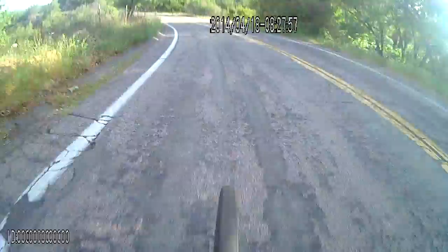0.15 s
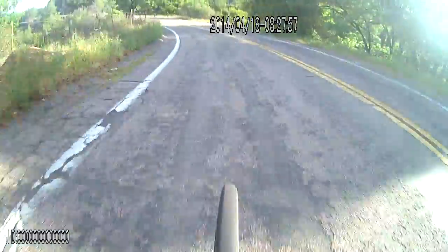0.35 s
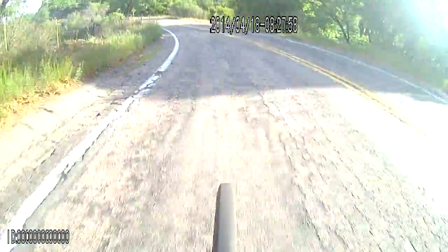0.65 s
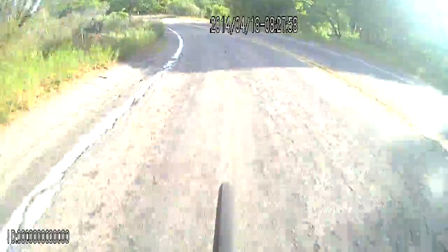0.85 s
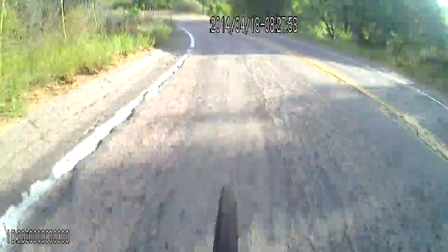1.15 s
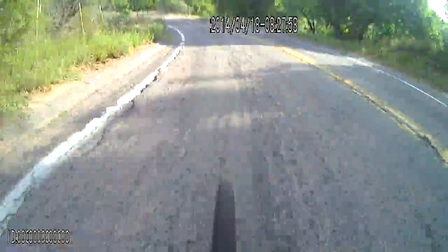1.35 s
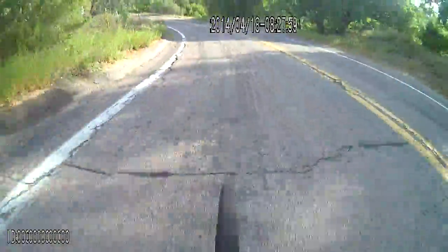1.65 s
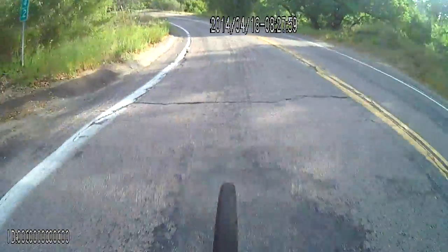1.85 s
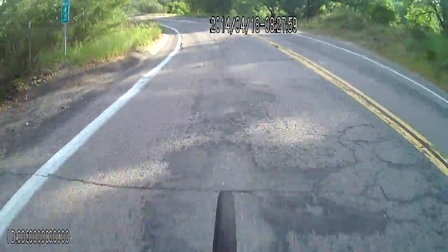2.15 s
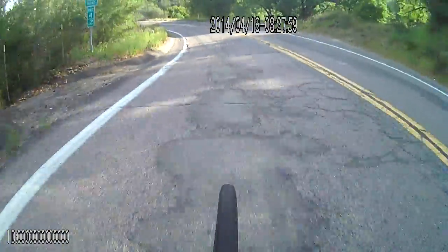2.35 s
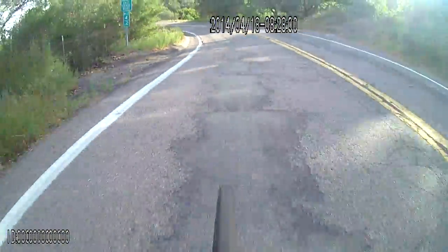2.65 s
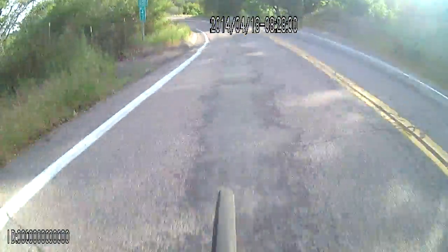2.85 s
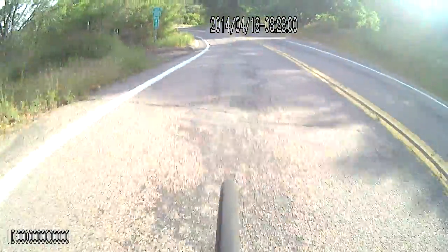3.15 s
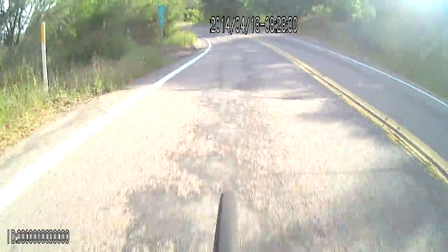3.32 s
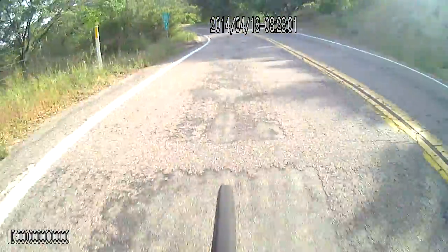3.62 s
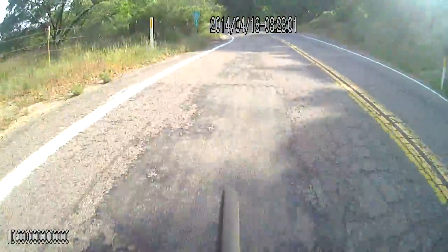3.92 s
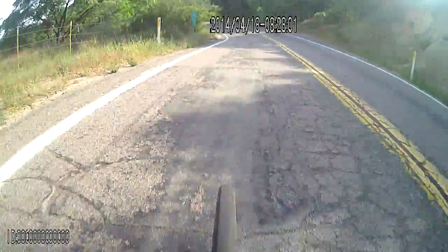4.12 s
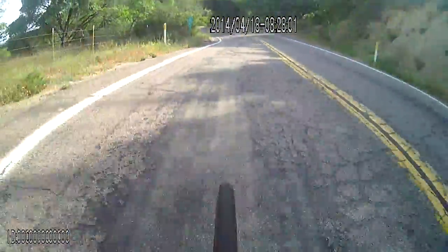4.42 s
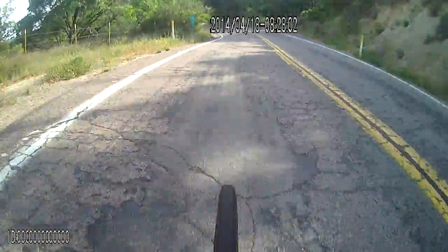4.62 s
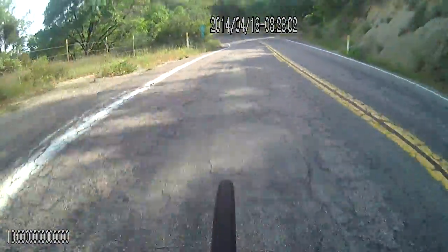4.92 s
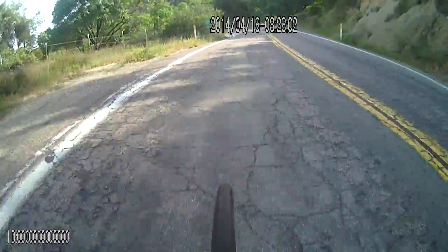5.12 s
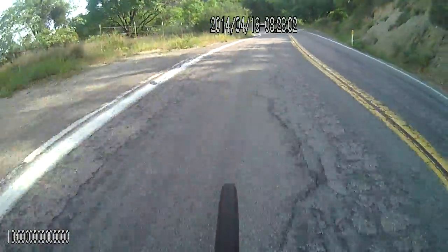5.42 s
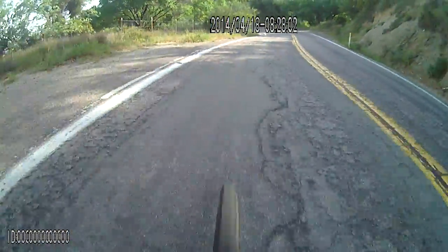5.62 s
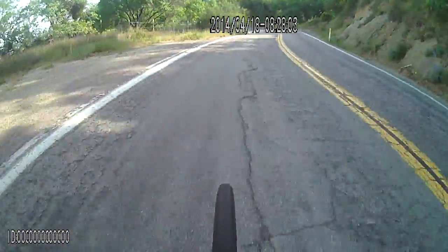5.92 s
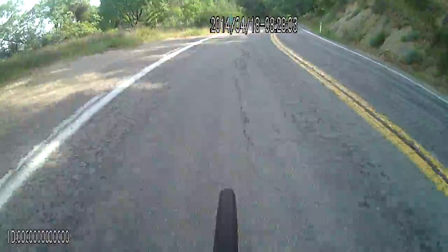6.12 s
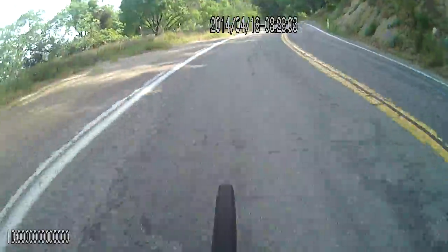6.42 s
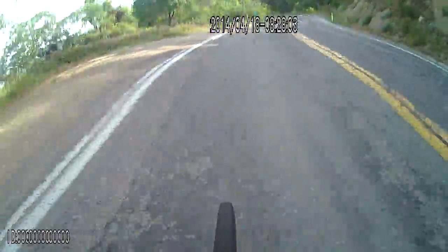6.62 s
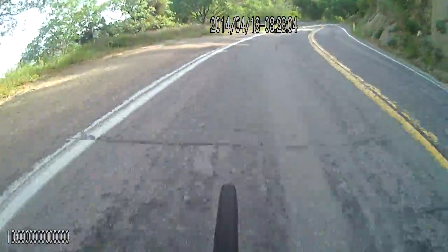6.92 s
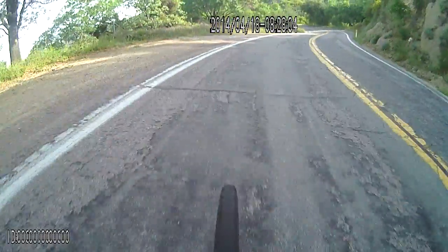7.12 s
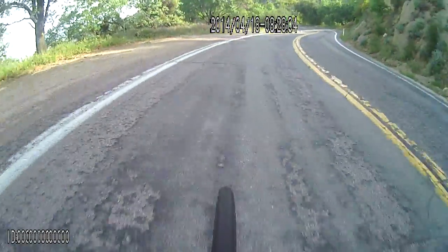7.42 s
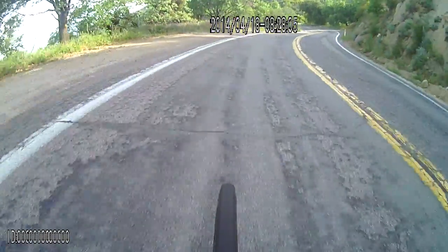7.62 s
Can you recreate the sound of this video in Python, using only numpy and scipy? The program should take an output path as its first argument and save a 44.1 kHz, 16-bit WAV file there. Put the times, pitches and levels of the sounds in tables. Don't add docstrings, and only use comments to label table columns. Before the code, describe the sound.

Close on a bicycle outdoors, a loose camera body chatters against its mount in bursts of about thirty knocks a second, each a dry thud with a piercing, very short high ring. Low turbulent wind rumbles and slaps the microphone in the gaps, pumping down at every hard knock and swelling back. Faint ticks, hiss and clinks fill in behind.

```python
import sys
import numpy as np
from scipy import signal
from scipy.fft import rfft, irfft, next_fast_len
from scipy.io import wavfile
from scipy.ndimage import uniform_filter1d

SR = 44100
rng = np.random.default_rng(int(sys.argv[2]) if len(sys.argv) > 2 else 0)


def linear_from_db(decibels):
    return 10 ** (np.asarray(decibels, float) / 20)


def dump(signal):
    limited = np.clip(np.atleast_2d(signal).T, -1, 1)
    pcm = np.round(limited * 32767).astype(np.int16)
    wavfile.write(sys.argv[1], SR, pcm)


N = 342216
RECOVER_DB_PER_S = 394

# start in seconds, peak in dB,
# pitch in Hz, contact in ms, dive of the gain in dB.
CLINKS = [(0.4092, -11.5, 1630, 2.9, 1), (.868, -23, 7600, 4, -10), (1.0924, -6.5, 1640, 2, 5.5),
          (2.022, -13, 1570, 2.3, -9), (3.494, -9.5, 1540, 2.6, 7), (4.677, -11.5, 1570, 2.5, -2),
          (4.784, -25, 7900, 2, 4.5), (5.06, -12.5, 1540, 2.7, 2), (5.104, -26, 7700, 3, 0),
          (5.133, -34, 7500, 2.8, 0), (6.11, -11.5, 1690, 2.1, -2), (6.565, -12, 1660, 2.1, 5.5),
          (6.753, -13.5, 1940, 7.8, 19), (6.7546, -21, 3920, 8, 5), (6.8088, -7, 1880, 1.2, 12),
          (6.807, -18, 3020, 1.9, 1), (6.91, -12.5, 1640, 2.6, -1.5), (7.451, -15.5, 2280, 8.2, 8),
          (7.585, -40, 1500, 2.5, 8), (7.634, -11.5, 1580, 2.2, 3), (7.6837, -13.5, 1560, 2.5, 6.5),
          (7.734, -15, 1610, 3, -7)]
# frequency in Hz, level in dB per Hz.
TICK_SPECTRUM = [(1500, 1), (3500, 1), (5200, -1.5), (7300, 2), (9300, -13), (11000, -9.5), (13000, -25),
                 (15300, -26), (16000, -60)]


def level(x, db):
    return x * linear_from_db(db) / np.sqrt(np.mean(x ** 2))


def modes(x, table, detune):
    out = 0
    for (hz, db, t60), d in zip(table, detune):
        pole = np.exp(2j * np.pi * hz * d / SR - np.log(1000) / (t60 * SR))
        out = out + linear_from_db(db) * signal.lfilter([1], [1, -pole], x).imag
    return out


def walk(rate):
    k = int(SR / rate)
    held = np.repeat(rng.standard_normal(N // k + 1), k)
    return 1.08 * uniform_filter1d(uniform_filter1d(held, k), k)[:N]


def colour(x, points, lo_hz=0, hi_hz=np.inf):
    size = next_fast_len(N)
    hz = np.arange(1, size // 2 + 2) * SR / size
    point_hz, point_db = np.array(points).T
    shape = linear_from_db(np.interp(np.log(hz), np.log(point_hz), point_db))
    return irfft(rfft(x, size) * shape * (hz >= lo_hz) * (hz < hi_hz), size)[:N]


def wind(shake_db):
    # frequency in Hz, level in dB per Hz.
    wind_spectrum = [(8.8, -38), (15, -1.5), (38, 1.5), (76, 0), (282, -10.5), (516, -12.5), (1010, -27),
                     (1100, -23.5), (1280, -36.5), (1550, -23.5), (1650, -30), (1880, -37), (2100, -61),
                     (2240, -59), (2600, -67), (3380, -75), (5720, -120)]
    edges_hz = [0, 45, 90, 180, 360, 720, 1400, 3000]
    swell = 0.23 * walk(15) + 1.38 * walk(45)
    flutter = [walk(25) for _ in edges_hz]
    out = 0
    for k in range(len(edges_hz) - 1):
        db = swell + 1.21 * (flutter[k] + flutter[k + 1]) + shake_db * (edges_hz[k] < 50)
        band = colour(rng.standard_normal(N), wind_spectrum, edges_hz[k], edges_hz[k + 1])
        out = out + linear_from_db(db) * band
    return level(out, 0)


def chatter():
    # frequency in Hz, level in dB per Hz.
    chatter_spectrum = [(590, -32), (1000, -4.5), (1110, -21), (1290, -5), (1650, 1), (2180, -10.5),
                        (2280, -17), (3710, -10.5), (5380, -40.5), (6940, -27.5), (9280, -41), (11000, -34),
                        (12500, -54), (14800, -46), (16000, -76)]
    hiss = linear_from_db(3.4 * walk(40)) * colour(rng.standard_normal(N), chatter_spectrum)
    size_db = np.minimum(3.9 * rng.exponential(size=N), 8.5) + 1.8 * walk(25)
    impulses = (rng.random(N) < 300 / SR) * linear_from_db(size_db)
    smear = signal.lfilter([1], [1, -.98], impulses) * rng.standard_normal(N)
    bright = level(colour(smear, TICK_SPECTRUM), -10.5)
    steady = level(colour(rng.standard_normal(N), TICK_SPECTRUM), -13.5)
    return level(hiss, 0) + bright + steady + level(colour(smear, chatter_spectrum), -2.5)


def handlebar(blows, road):
    # frequency in Hz, level in dB, t60 in seconds.
    boom = (495, -24, 0.083)
    return level(modes(blows + 0.019 * road, [boom], [1]), boom[1])


def spoke(blows, road):
    # frequency in Hz, level in dB, t60 in seconds.
    thin_ring = (2117, -40, 0.21)
    return level(modes(blows + 0.0012 * road, [thin_ring], [1]), thin_ring[1])


def rattle():
    # start in seconds, shrill ring in dB, thud in dB, dive of
    # the gain in dB.
    mount_knocks = [(0.0035, -6.5, -33, 17.5), (0.035, -14, -23, 0), (0.0643, -0.5, -26, 11),
                    (0.0853, -10, -16, 8.5), (0.1199, 0, -5.5, 27), (0.1485, -9, -19, 20),
                    (0.174, -19, -44, 7), (0.2159, -7.5, -7, 18), (0.241, -14, -19, 9.5),
                    (0.2774, -2, -13.5, 17.5), (0.3086, -6.5, -14.5, 14), (0.761, -1, -44, 17.5),
                    (0.787, -6, -28, 15.5), (0.892, -10, -8, 12), (0.9176, -15, -18, 13),
                    (0.9473, -10, -16.5, 16), (0.9768, -15, -16.5, 18.5),
                    (1.1057, 7.5, -6.5, 31), (1.1396, -6.5, -17, 26), (1.1738, -4.5, -12, 27.5),
                (1.205, -5.5, -21, 23.4), (1.2419, -2.5, -10, 24), (1.276, -5, -16, 19),
                (1.309, -8.5, -11.5, 20), (1.3356, -5.5, -12.5, 16), (1.368, -2, -11, 22.3),
                (1.3944, -12, -21, 10), (1.415, -0.5, -12, 26), (1.4469, -13, -12.5, 20),
                (1.5398, -9, -7, 13.3), (1.5718, -12, -17, 27), (1.6051, -10, -22, 18.5),
                (1.713, 3, -9, 23), (1.7972, 0.5, -8, 28), (1.8251, -12, -14.5, 15),
                (1.8705, -1, -12.5, 25.6), (1.938, 4.5, -3.5, 31.3), (1.966, -18, -20.5, 9),
                (2.0364, 0, -9.5, 28.6), (2.0787, -2, -7.5, 28), (2.1147, -2.5, -9, 24),
                (2.147, -5, -19, 26), (2.1845, -3, -11, 26.6), (2.238, -7, -37, 13),
                (2.269, -4.5, -25, 18.4), (2.2895, -9, -14.5, 17.5),
                    (2.7613, 3, -7, 28), (2.8076, -2, -8, 26.5), (2.847, -2.5, -13, 30),
               (2.8806, -7.5, -20.5, 21), (2.913, -3, -12.5, 24.6), (2.9542, -3, -14, 27),
               (2.987, -6, -10.5, 23.4), (3.0255, 1.5, -7, 30), (3.063, -10, -14, 24),
               (3.097, -4.5, -14, 24.4), (3.13, -6.5, -14, 14.4), (3.1692, -2, -9, 18.5),
               (3.2023, -6, -17.5, 14), (3.241, -4, -11.5, 20), (3.274, -5.5, -16.5, 23),
               (3.305, -7.5, -17, 20), (3.348, 2, -6.5, 33), (3.373, -13, -23, 27),
               (3.406, -6.5, -16, 22.4), (3.5109, 3.5, -7.5, 29.3), (3.5404, -10, -16.5, 15),
               (3.569, -3.5, -20.5, 19.6), (3.6525, -11, -31, 7.4), (3.957, -1, -8, 23.3),
                    (4.3986, -17, -44, 4.8), (4.43, 2, -7.5, 31), (4.4706, 1.5, -7.5, 28), (4.5079, -5, -11, 32),
              (4.5488, -5, -10, 22.7), (4.5994, -9, -16, 10.7), (4.6738, -19, -16, 3.6),
              (4.7309, -9.5, -9.5, 19), (4.8429, 3, -13.5, 27), (4.8706, -17, -15.5, 13),
              (4.9094, -9.5, -18, 1), (4.9416, 6.5, -6.5, 36), (4.975, -11.5, -16.5, 23),
              (5.0038, -14, -36, 10), (5.029, -4.5, -32, 16), (5.075, -1.5, -14, 21),
              (5.6903, -12, -11, 22.5), (5.7168, -19, -28, 18.3), (5.7709, 0.5, -6, 26.5),
              (5.8031, -5.5, -13, 23), (5.837, -4.5, -13, 21.5), (5.8645, -22, -30, 13.6),
                    (6.0094, -11, -13, 5.5), (6.12, 3, -20, 26), (6.1532, -6, -15, 27), (6.188, -5, -14, 25),
             (6.222, -10, -16, 22), (6.336, -10, -36, 8), (6.5741, -6, -11, 27.5), (6.625, 2.5, -5.5, 31.5),
             (6.6793, 3.5, -7, 29.5), (6.719, -3.5, -14.5, 27), (6.7557, -16, -18, 16.5),
             (6.795, -18, -46, -1.5), (6.8167, -17, -19, 11.5), (7.2149, 0, -13, 20),
             (7.236, -15, -13, 20.5), (7.2646, -2.5, -16, 20), (7.2924, -14, -9.5, 17.5),
             (7.451, -11.5, -10.5, 11.5)]
    return mount_knocks


def contacts(table, ms):
    scatter = np.exp(0.3 * rng.standard_normal(len(table)))
    return [(*row[:3], ms * k) for row, k in zip(table, scatter)]


def knocks(table, pitch):
    # frequency in Hz, level in dB, t60 in seconds.
    ring_modes = [(7700, 15.5, 0.012), (7570, 12, 0.0047), (7900, 6, 0.018), (8400, -52, 0.0026)]
    body_modes = [(515, -13, 0.0082), (1610, 12, 0.0074), (2315, 2, 0.0084), (3124, -1, 0.012),
                  (3720, -7, 0.022), (5030, -7, 0.021), (6330, -40, 0.0084), (9650, 7, 0.004),
                  (11000, -23, 0.0026), (13000, -9, 0.0035), (15400, -24, 0.0026)]
    size = 1024
    t = np.arange(size) / SR
    chance = rng.standard_normal((len(table), 2, size))
    tune = 1 + 0.019 * rng.standard_normal((len(table), len(ring_modes) + len(body_modes)))
    bias_db = 1.7 * rng.standard_normal((len(table), len(body_modes)))
    fade = np.exp(-(t / 0.0081) ** 2)
    port = signal.butter(2, [6800, 8300], "bandpass", fs=SR, output="sos")
    tap = np.exp(-t / .00004)
    out, blows = np.zeros(N + size), np.zeros(N + size)
    for (s, ring_db, thud_db, ms), (scrape, grit), detune, bias in zip(table, chance, tune, bias_db):
        contact = np.clip(t / (ms * 0.00071), 0, 1)
        push = np.sin(np.pi * contact ** 0.66) + 0.36 * contact * np.exp(-t / 0.0029)
        ring = modes(scrape * push, ring_modes, pitch * detune)
        ring = fade * (0.96 * ring + signal.sosfilt(port, ring))
        blow = tap + grit * (0.083 * np.exp(-t / 0.0022) + 0.037 * np.exp(-t / 0.0028))
        struck = [(hz, db + b, t60) for (hz, db, t60), b in zip(body_modes, bias)]
        thud = fade * modes(blow, struck, detune[len(ring_modes):])
        start = max(int((s - .0004) * SR), 0)
        out[start:start + size] += linear_from_db(ring_db) * ring / np.abs(ring).max()
        out[start:start + size] += linear_from_db(thud_db + 6.0) * thud / np.abs(thud).max()
        blows[start] += linear_from_db(thud_db)
    return np.array([out[:N], blows[:N]])


def all_knocks():
    # start in seconds, shrill ring in dB, thud in dB.
    taps = [(0.1538, -8, -41), (0.4501, -21, -19), (0.4776, -20, -16), (0.6461, -17, -53),
            (0.8541, -24, -14.5), (0.9257, -9.5, -33), (0.9496, -14, -35), (0.9831, -8, -33),
            (1.1418, -8, -24), (1.4495, -8, -22), (1.5232, -22, -14), (1.5763, 0, -41), (1.7703, -22, -34),
            (1.8037, -8, -25), (3.066, -7.5, -39), (3.1355, -12, -28), (3.2795, -8, -42),
            (3.3762, -10, -21), (4.7372, -6.5, -19), (5.3148, -12.5, -29), (5.6982, -4.5, -27),
            (5.7264, -12, -26), (6.3065, -16, -43), (6.5781, -7, -26), (6.7893, -28, -17),
            (7.1831, -25, -28), (7.2413, -8, -43), (7.4286, -21, -21), (7.62, -21.5, -20),
            (7.7456, -17, -23.5)]
    rebounds = [(0.0084, -20, -46), (0.1246, -14, -32), (0.2223, -7, -26), (0.245, -22, -32),
                (0.8987, -13, -32), (0.9182, -18, -27), (0.9559, -15, -39), (0.98, -21, -30),
                (1.1101, -13, -30), (1.1776, -13, -30), (1.2097, -16, -38), (1.2456, -18, -35),
                (1.2816, -17, -38), (1.3136, -17, -36), (1.3159, -26, -41), (1.5412, -16, -28),
                (1.8299, -22, -26), (1.8769, -17, -44), (1.9417, -15, -32), (2.0451, -11, -39),
                (2.1201, -17, -38), (2.1901, -15, -38), (2.2978, -16, -42), (2.9191, -13, -33),
                (2.961, -23, -48), (2.9913, -13, -34), (3.0294, -17, -33), (3.0695, -22, -42),
                (3.1016, -14, -30), (3.1724, -18, -31), (3.1746, -21, -41), (3.2104, -13, -33),
                (3.2459, -12, -30), (3.312, -15, -40), (3.3519, -17, -32), (3.3804, -22, -38),
                (3.4126, -23, -46), (3.4931, -28, -20), (3.5439, -23, -35), (3.9646, -18, -42),
                (4.4736, -13, -30), (4.5535, -12, -37), (4.6053, -15, -28), (4.7323, -24, -22),
                (4.9761, -8, -32), (5.692, -14, -27), (5.6946, -29, -31), (5.7191, -22, -32),
                (5.7769, -14, -40), (5.8091, -9, -31), (5.8431, -22, -39), (5.8695, -19, -37),
                (6.1597, -14, -34), (6.1937, -10, -33), (6.2278, -9, -37), (6.5743, -6, -15),
                (6.7234, -11, -36), (6.7946, -25, -20), (6.8229, -17.5, -34), (7.2952, -31, -29)]
    main = knocks(contacts(rattle(), 3.07), 0.97)
    return main + knocks(contacts(taps, 2), 0.984) + knocks(contacts(rebounds, 2.5), 1.006)


def ticks():
    # start in seconds, peak in dB, brightest frequency
    # in Hz.
    loud_ticks = [(0.1018, -20, 6700), (0.3524, -24, 7400), (0.4093, -29, 7300), (0.4232, -28, 7600),
                  (0.4381, -27, 6900), (0.4675, -27, 7800), (0.4914, -30, 7300), (0.501, -25, 7000),
                  (0.527, -33, 5900), (0.5432, -25.5, 7700), (0.553, -26, 6400), (0.5999, -27, 4000),
                  (0.6232, -30, 4000), (0.6329, -28, 6400), (0.6845, -31, 4000), (0.7426, -26, 7600),
                  (0.847, -30, 7700), (0.8816, -26, 6200), (1.0852, -30, 7700), (1.0917, -27, 9800),
                  (1.4831, -29, 7600), (1.5139, -21.5, 7400), (1.5719, -26, 7300), (1.6834, -29, 9400),
                  (1.6893, -25, 7700), (1.6953, -25, 7200), (1.8482, -33, 7000), (1.908, -29, 4000),
                  (1.9171, -28, 6200), (2.0232, -24, 6740), (2.2644, -35, 7500), (2.3505, -34, 4700),
                  (2.3849, -27, 7600), (2.4232, -27, 7300), (2.4591, -24.5, 6800), (2.5051, -24, 7700),
                  (2.6022, -26.5, 10700), (2.6863, -35, 7800), (2.7354, -31, 7600), (3.4463, -33, 6700),
                  (3.4625, -26, 7100), (3.4773, -28, 6760), (3.4875, -20.5, 7000), (3.4928, -27, 10600),
                  (3.5558, -32, 7200), (3.6427, -33, 7300), (3.6756, -38, 10700), (3.681, -33, 7500),
                  (3.7729, -37, 4700), (4.0516, -26.5, 7700), (4.0907, -26, 10900), (4.1992, -33, 6900),
                  (4.2069, -33, 6100), (4.22, -31, 10900), (4.2431, -34, 4000),
                  (4.3327, -28, 7100), (4.5917, -26, 9000), (4.622, -39, 6500), (4.6502, -32, 7150),
            (4.7156, -21, 4700), (4.7639, -32, 7700), (4.8157, -30, 7000), (4.8268, -29, 7000),
            (5.0604, -29, 10500), (5.2304, -28, 6700), (5.2563, -25.5, 7100), (5.2959, -33, 7140),
            (5.4283, -38, 4000), (5.4347, -34, 4000), (5.455, -34, 6100), (5.6484, -37, 4030),
            (5.6625, -29, 4000), (5.7514, -36, 7700), (5.9052, -35, 4000), (5.9816, -34, 11000),
            (6.0373, -26, 7500), (6.0585, -26, 10900), (6.0625, -27, 7400), (6.0661, -32, 7000),
            (6.1111, -25, 5800), (6.2474, -29, 7100), (6.3251, -36, 10900), (6.3662, -33, 7600),
            (6.4182, -31, 9900), (6.445, -28, 7700), (6.456, -33, 7000), (6.516, -26, 4000),
            (6.5623, -23, 10700), (6.8842, -31, 6900), (6.9028, -27, 7000), (6.9114, -31, 4000),
            (6.9229, -29, 7540), (6.9439, -36, 7500), (6.9732, -40, 7500), (7.1139, -26.5, 6900),
            (7.1465, -25, 7700), (7.1541, -26, 7000), (7.1961, -24, 7100), (7.2035, -25, 4000),
            (7.3083, -34, 6900), (7.3217, -32, 6240), (7.3554, -26.5, 7800), (7.4052, -32, 6300),
            (7.439, -24, 5500), (7.4819, -27.5, 7700), (7.5402, -24.5, 4000), (7.635, -22, 6000),
            (7.6584, -31, 4000), (7.6703, -31, 7500), (7.7338, -29, 4000)]
    rows = loud_ticks
    t, out = np.arange(512) / SR, np.zeros((2, N + 512))
    push = (1 - np.exp(-t / 0.00026)) * np.exp(-t / 0.0014)
    for (s, db, hz), rub in zip(rows, rng.standard_normal((len(rows), 2, len(t)))):
        mode = [(hz, 0, 0.0014)]
        narrow = modes(modes(push * rub[0], mode, [1]), mode, [1])
        pair = np.array([narrow / np.abs(narrow).max(), push * rub[1]])
        out[:, int(s * SR):][:, :len(t)] += linear_from_db(db) * pair
    broad = colour(out[1, :N], TICK_SPECTRUM)
    return linear_from_db(-1.0) * out[0, :N] + linear_from_db(9.0) * broad


def clinks():
    t, out = np.arange(768) / SR, np.zeros(N + 768)
    for (s, db, hz, ms, _), rub in zip(CLINKS, rng.standard_normal((len(CLINKS), len(t)))):
        contact = np.sin(np.pi * np.clip(t / (ms * 0.00076), 0, 1))
        glide = np.sin(2 * np.pi * hz * t * (1.03 - 8 * t))
        ring = modes(contact * (0.9 * rub + glide), [(hz, 0, .009)], [1])
        out[int(s * SR):][:len(t)] += linear_from_db(db) * ring / np.abs(ring).max()
    return out[:N]


def slapped(x):
    # start in seconds, signed swing as a share of full scale.
    slaps = [(.6017, .82), (0.678, -.84), (1.6612, 0.8), (2.4724, .92), (2.601, -0.74), (2.7395, 1.05),
             (3.7456, 1.02), (3.8193, 0.76), (3.918, -.83), (4.22, 0.88), (4.3363, 0.87), (4.385, -1.02),
             (4.7021, 0.83), (5.1786, 0.95), (5.2178, 0.86), (5.2847, .99), (5.4004, 0.94), (5.4688, 0.93),
             (5.537, 1.05), (5.6241, 0.91), (5.965, -.94), (6.43, -0.85), (6.457, -1.1), (6.5239, -0.85),
             (6.5376, .99), (6.9353, -.94), (7.0092, -0.92), (7.382, -0.98), (7.5667, 0.85), (7.5839, 1.02),
             (7.6844, -0.95)]
    t, push, share = np.arange(N) / SR, np.zeros(N), np.zeros(N)
    for s, swing in slaps:
        span = slice(int((s - .01) * SR), int((s + .01) * SR))
        share[span] = np.exp(-((t[span] - s) / 0.0016) ** 2)
        push[span] = swing * share[span]
    return x * (1 - 0.85 * share) + push


def gain_dive():
    t, dive = np.arange(N) / SR, np.zeros(N)
    for s, *_, dive_db in rattle() + CLINKS:
        span = slice(int(s * SR), int((s + .15) * SR))
        since = t[span] - s
        climb = dive_db - RECOVER_DB_PER_S * np.maximum(since - .010, 0)
        shape = np.minimum(dive_db * since / 0.0059, climb)
        dive[span] = np.maximum(dive[span], shape)
    return dive


def duck(x):
    dive_db = 8
    since, dip = np.arange(2048) / SR, np.zeros(N + 2048)
    climb = dive_db - RECOVER_DB_PER_S * np.maximum(since - 0.008, 0)
    shape = np.minimum(dive_db * since / 0.0032, climb)
    over = np.flatnonzero(np.abs(x) > 0.89)
    for i in over[np.diff(over, prepend=-N) > SR / 50]:
        dip[i:i + len(since)] = np.maximum(dip[i:i + len(since)], shape)
    return x * linear_from_db(-dip[:N])


def scene():
    # time in seconds, level in dB.
    gusts = [(0.0, -23), (0.18, -14.5), (0.36, -14.5), (0.56, -10), (1.08, -11), (1.3, -14.5), (1.8, -10),
             (2.0, -7.5), (2.17, -11.5), (2.35, -9.5), (2.71, -11), (3.2, -16), (3.45, -11), (4.33, -8.5),
             (4.51, -12.5), (4.69, -10.5), (5.9, -10.5), (7.76, -10)]
    wind_db = np.interp(np.arange(N) / SR, *np.transpose(gusts))
    chatter_db = -34 + 0.05 * (wind_db - wind_db.mean())
    hits, blows = all_knocks()
    road = rng.standard_normal(N)
    dive = gain_dive()
    bed = linear_from_db(wind_db) * wind(0.155 * dive)
    bed = bed + linear_from_db(chatter_db + 0.24 * dive) * chatter()
    bed = bed + linear_from_db(0.16 * dive) * handlebar(blows, road)
    bed = bed + linear_from_db(0.31 * dive) * spoke(blows, road)
    return (duck(slapped(bed * linear_from_db(0.8 - dive))) + hits + clinks() + ticks())[None]


def low_pass(x):
    return signal.sosfilt(signal.butter(12, 16380, fs=SR, output="sos"), x)


def record(dry):
    knee = 0.99
    dry = dry - 0.035 * np.clip(dry, -1.5, 1.5) ** 2
    over = np.maximum(np.abs(dry) - knee, 0)
    top = np.sign(dry) * (np.minimum(np.abs(dry), knee) + (1 - knee) * np.tanh(over / (1 - knee)))
    top = signal.sosfilt(signal.ellip(6, .2, 45, 15350, fs=SR, output="sos"), top)
    return low_pass(top - .0095)


dry = scene()
out = record(dry)
dump(out)
```